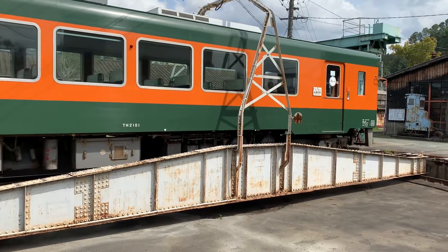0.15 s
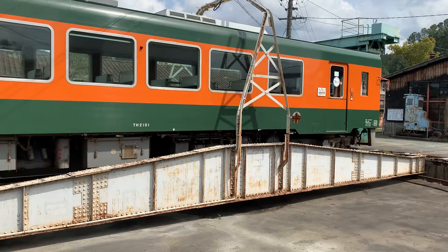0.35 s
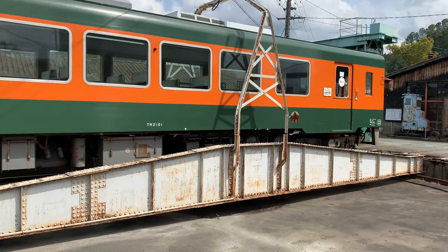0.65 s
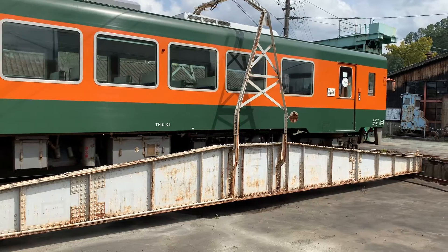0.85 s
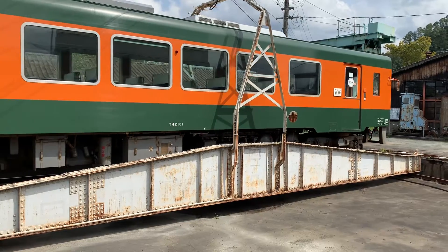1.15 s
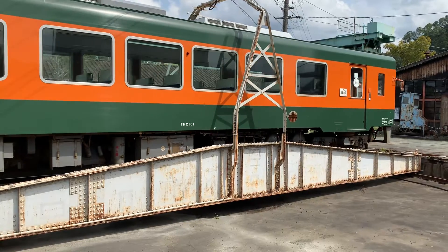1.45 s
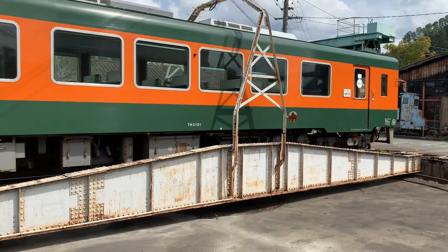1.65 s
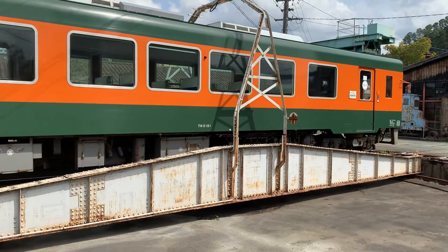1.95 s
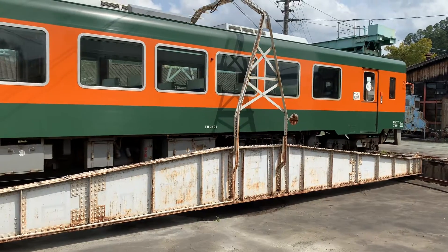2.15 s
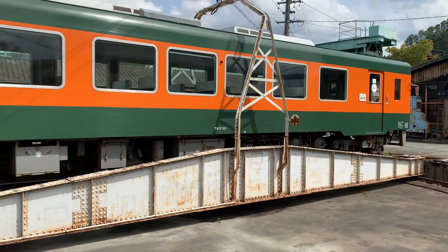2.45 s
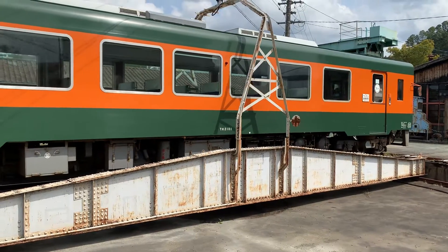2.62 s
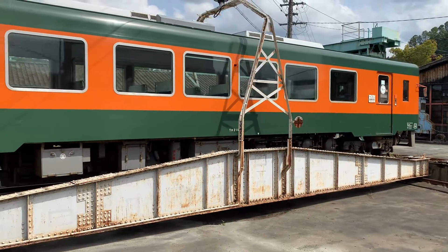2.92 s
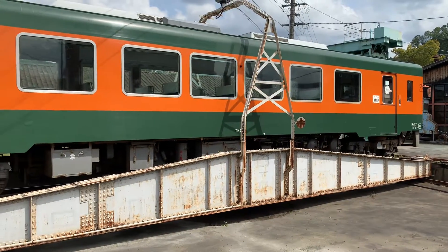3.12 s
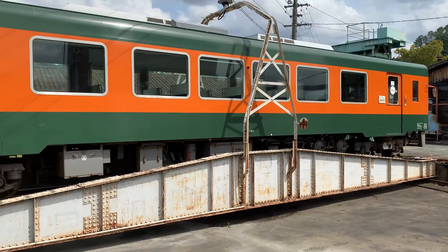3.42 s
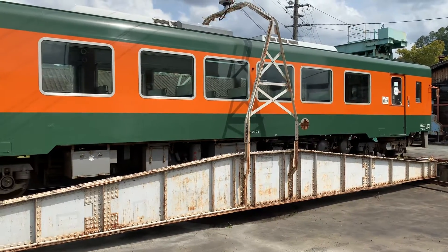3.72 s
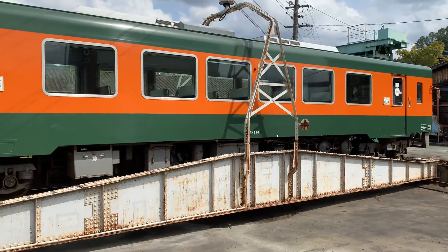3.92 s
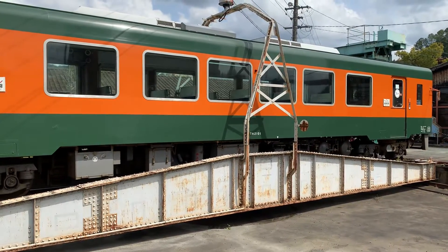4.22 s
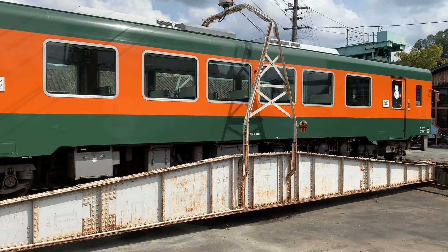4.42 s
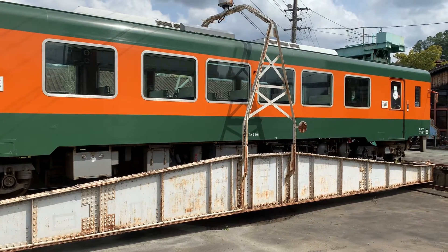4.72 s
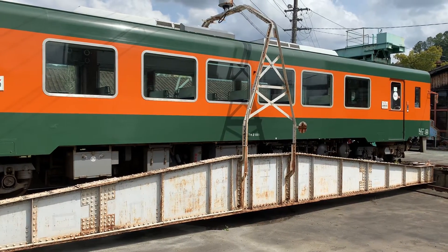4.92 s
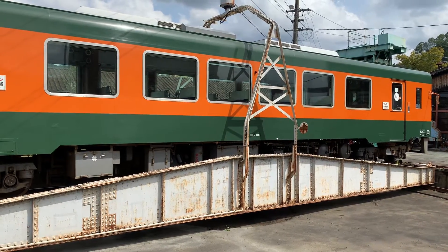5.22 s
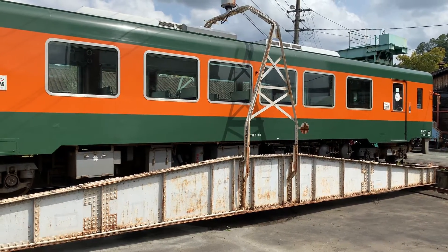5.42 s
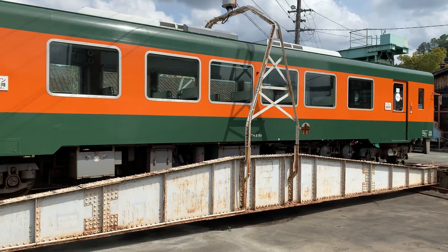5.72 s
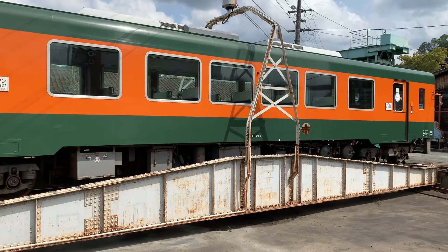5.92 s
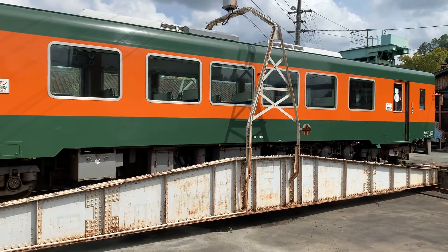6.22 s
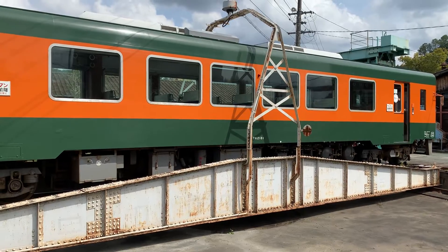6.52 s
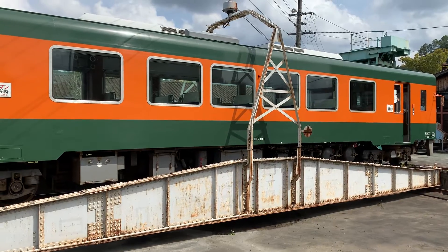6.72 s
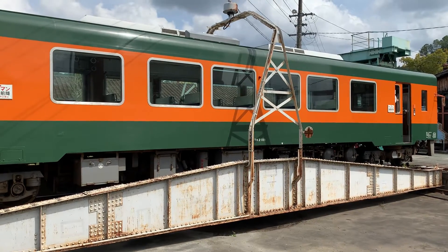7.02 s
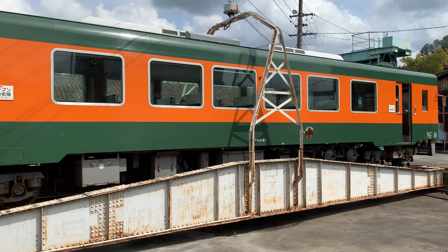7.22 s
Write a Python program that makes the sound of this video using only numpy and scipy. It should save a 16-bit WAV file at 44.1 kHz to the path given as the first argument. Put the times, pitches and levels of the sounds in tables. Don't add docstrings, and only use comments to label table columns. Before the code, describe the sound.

A diesel railcar idles with a steady roar and whine while its wheels clank heavily over rail gaps on a steel turntable bridge.

```python
import sys
import numpy as np
from scipy import signal
from scipy.fft import rfft, irfft, next_fast_len
from scipy.io import wavfile
from scipy.ndimage import uniform_filter1d

SR = 44100
rng = np.random.default_rng(int(sys.argv[2]) if len(sys.argv) > 2 else 0)


def volts_from_db(level):
    exponent = np.asarray(level, float) / 20
    return 10 ** exponent


def transcribe(u):
    v = np.clip(np.atleast_2d(u).T, -1, 1)
    q = np.round(v * 32767).astype(np.int16)
    wavfile.write(sys.argv[1], SR, q)


N = 324576
T = np.arange(N) / SR

# (time [s], plates [dB], beams [dB], rails [dB], wheel ring [dB])
CLUNKS = [(0.22, -32, -20, -38, -39), (0.245, -7, -15, -36, -30), (0.33, -14, -12, -28, -26),
          (0.386, -13, -8.5, -20, -6.5), (0.507, -26, -19, -14, -15), (0.536, -26, -27, -3, -10),
          (0.567, -22, -24, -12, -36), (0.735, -23, -20, -44, -48), (2.745, -24, -15, -34, -41),
          (0.997, -25, -32, -30, -24), (7.004, -18, -22, -42, -26), (1.943, -17.5, -33, -28, -42),
          (2.28, -27, -21, -27, -23), (2.468, -26, -19, -19, -16.5), (2.488, -14.5, -23, -17, -14.5),
          (2.894, -25, -16.5, -36, -38), (3.113, -18, -41, -39, -40), (4.049, -26, -28, -26, -35),
          (6.504, -11.5, -24, -23, -29), (6.559, -11, -11.5, -32, -35), (6.64, -18, -24, -23, -17.5),
          (6.692, -22, -10, -11, -24), (6.728, -15, -11.5, -34, -31), (6.813, -20, -11.5, -39, -32),
          (0.26, -24, -15, -22, -33), (0.301, -22, -21, -19, -30), (0.394, -26, -20, -15, -10),
          (0.444, -24, -22, -13, -20), (0.467, -15, -18, -19, -18), (0.636, -13.5, -15, -21, -40),
          (0.688, -16, -18, -26, -41), (2.507, -20, -22, -15, -24), (2.534, -18, -25, -18, -23),
          (2.609, -13, -19, -25, -36), (2.686, -15.5, -17, -26, -34), (2.803, -31, -16, -42, -38),
          (2.996, -14.5, -19, -21, -42), (3.165, -38, -35, -33, -38), (6.758, -14, -24, -28, -28),
          (6.942, -22, -17, -36, -40)]
# (time [s], level [dB], pitch [Hz])
THUDS = [(.742, -9, 90), (6.49, -22, 280), (2.75, -11, 99), (2.69, -20, 110), (.59, -18, 1100),
         (1.005, -22, 80), (1.47, -20, 125), (1.53, -21, 125), (1.61, -26, 90), (1.715, -20, 85),
         (1.91, -29, 290), (1.95, -32, 289.2), (2.13, -25, 125), (2.287, -16, 189.4), (2.297, -15, 90),
         (3.205, -22, 75), (3.285, -24, 70), (3.405, -25, 70), (3.53, -29, 70), (3.74, -24, 75),
         (3.845, -21, 90), (3.965, -24, 75), (4.055, -20, 125), (4.085, -25, 70), (4.465, -25, 125),
         (4.595, -18, 75), (4.96, -20, 85), (5.105, -23, 90), (5.425, -20.5, 121), (5.45, -20, 75),
         (5.545, -23, 120), (5.69, -24, 85), (5.76, -26, 120), (5.95, -30, 85), (6.27, -28, 75),
         (6.44, -28, 74.8), (.25, -15, 300), (.345, -17, 110), (.573, -16, 264), (.405, -14, 160),
         (.415, -14, 200), (6.701, -16, 130), (6.82, -15, 110), (7.3, -26, 270)]
# (time [s], level [dB], pitch [Hz])
KNOCKS = [(.444, -14, 706), (.534, -15, 1240), (.544, -12, 740), (.559, -9, 442), (.849, -24, 790),
          (1.038, -31, 2120), (1.054, -32, 431.7), (1.18, -22, 818), (1.26, -21, 412), (1.285, -31, 428),
          (1.707, -23, 860), (1.846, -21, 688), (1.88, -24, 635), (1.945, -17.5, 559), (2.168, -23, 624),
          (2.39, -23, 551), (2.472, -20, 816), (2.474, -19, 1620), (2.575, -22, 600), (6.515, -30, 2900),
          (6.51, -36, 4230), (6.64, -26, 998), (2.49, -12, 576), (2.496, -22, 1291), (2.508, -19, 344),
          (2.538, -17, 340), (2.563, -29, 900), (2.53, -28, 705), (3.008, -24, 796), (3.119, -20, 390),
          (3.326, -22, 409), (3.572, -26, 386.6), (4.775, -19, 1210), (4.852, -26, 430), (6.107, -28, 452),
          (6.494, -29, 2669), (6.504, -25, 2760), (6.53, -17, 610), (6.582, -40, 4651), (6.629, -21, 540),
          (6.666, -16.5, 581), (6.666, -34, 4177), (6.776, -20, 344.4), (6.867, -30, 841),
          (7.098, -26, 347), (7.263, -29, 343.4), (7.335, -27, 565), (.39, -35, 5211), (.39, -42, 5813),
          (.541, -37, 6373), (.54, -35, 6933), (.538, -16, 1593), (2.482, -42, 5211), (2.483, -47, 6070),
          (2.497, -37, 3850), (2.495, -45, 7278), (6.497, -36, 4080)]

# (frequency [Hz], level [dB], t60 [s])
SPAN_MODES = [(50, 0, 0.53), (62, -3, 0.36), (80, -2.5, 0.19)]
# (frequency [Hz], level [dB], t60 [s])
BEAM_MODES = [(95.9, -5, 0.49), (119, 0.5, 0.27), (140, -7.5, 0.21)]
# (frequency [Hz], level [dB], t60 [s])
PLATE_MODES = [(165, -13, 0.034), (219.5, -3.5, 0.23), (256.7, 2, 0.14), (298.7, -1.5, 0.21),
               (342.6, 4, 0.087), (408.3, 3.5, 0.1)]
# (frequency [Hz], level [dB], t60 [s])
RAIL_MODES = [(455, -6, 0.044), (552, -2.5, 0.083), (678, 1.5, 0.052), (780, 2.5, 0.045), (884, -13, 0.11),
              (1059, -4.5, 0.036), (1310, -15, 0.021)]
# (frequency [Hz], level [dB], t60 [s])
WHEEL_MODES = [(1420, -17, .04), (1591, 6, 0.058), (1689, 10.5, 0.055), (1582, 9, 0.047), (1700, -3, 0.05),
               (2055, 4, 0.1), (2257, -2.5, 0.15), (2720, -28, .04), (2970, -24, .04)]

# (time [s], level [dB])
ROLLING = [(0, -27), (.17, -34), (.8, -23.5), (1.15, -26.5), (1.4, -30.5), (2.1, -31.5), (2.9, -25),
           (3.15, -29), (3.5, -33), (4.6, -34.5), (5.5, -33), (6.45, -34.5), (7, -31), (7.36, -31)]
# (start [s], hold [s], shaking [dB])
CROSSINGS = [(0.165, 0.19, -20), (0.362, 0.087, -15.5), (0.496, 0.038, -15.5), (0.853, 0.15, -27.5),
             (1.823, 0.044, -25.5), (2.378, 0.025, -23.5), (2.462, 0.033, -17), (2.575, 0.017, -39),
             (6.481, 0.042, -19), (6.601, 0.033, -19), (6.68, 0.03, -19.5)]
# (time [s], level [dB], pitch [Hz])
SWAYS = [(0.309, -14.5, 101.5), (.36, -13, 52.3), (.52, -13.5, 79.7), (0.711, -18, 77), (.97, -34, 53.2),
         (1.22, -41, 62), (1.57, -23, 75), (1.85, -34, 69.64), (2.27, -24, 62), (2.389, -18.5, 114),
         (2.52, -19, 69), (2.629, -18, 73.5), (2.761, -17, 84.7), (2.821, -17.5, 62), (2.889, -32, 83.3),
         (3.249, -20, 59), (3.5, -28, 62), (3.72, -33, 74), (4.039, -33, 80.9), (4.441, -28, 99.5),
         (4.571, -28, 71.2), (4.92, -23, 62), (5.44, -27.5, 76.96), (5.7, -40, 75.1), (6.56, -18, 104),
         (6.611, -15.5, 79.5), (6.681, -21, 109.6), (6.685, -26, 140), (6.759, -25, 79), (7.1, -33, 68.64),
         (1.45, -30, 60), (3.38, -33, 55.02), (3.92, -24, 55), (4.46, -32, 151), (5.06, -31, 73.5),
         (5.2, -32, 51.7), (5.38, -23, 50), (5.58, -25, 58), (5.82, -35, 80), (5.6, -39, 140)]
# (start [s], hold [s], puff of air [dB], rattle of grit [dB])
JOLTS = [(0.214, 0.024, -47, -31), (0.3, 0.024, -51, -30.5), (0.375, .01, -41, -35), (0.48, 0.13, -47, -35),
         (0.784, 0.013, -45, -61), (0.903, 0.02, -51, -60), (0.999, 0.018, -43.5, -52),
         (1.212, 0.032, -52, -44), (2.466, .003, -52, -41), (2.474, 0.0086, -48, -42),
         (2.87, 0.024, -51, -42), (3.182, 0.02, -47, -39.5), (6.453, .015, -51, -34),
         (6.48, 0.033, -42, -27.5), (6.757, .02, -56, -40), (6.566, 0.11, -42.5, -33),
         (6.692, 0.059, -48, -35.5), (6.84, 0.083, -55, -40), (7.018, 0.072, -60, -40.5),
         (7.332, 0.01, -47, -46)]
JOLT_RISE_S, JOLT_T60_S = 0.0073, 0.1
# (frequency [Hz], density [dB per Hz])
GRIT = [(900, -1), (1500, -4.5), (2000, -4), (2800, -4), (3600, -8), (5000, -14.5), (9000, -21.5),
        (12000, -36), (15900, -32)]
# (time [s], pitch [Hz], level [dB])
GROAN = [
    (0.95, 118.5, -38),
    (1.1, 116.3, -25.5),
    (1.42, 119.8, -41),
    (1.5, 130.2, -34.5),
    (1.95, 139, -31),
    (2.24, 142.5, -31),
    (2.31, 143.4, -34),
    (2.42, 146, -25.5),
    (2.7, 151, -32),
]
# (time [s], pitch [Hz], level [dB])
LATE_GROAN = [
    (6.9, 137.2, -21),
    (6.96, 139.5, -38),
    (7.15, 145, -31.5),
    (7.25, 147.5, -49),
]
# (start [s], hold [s], level [dB])
ROUGH_BURSTS = [
    (1.34, 0.24, -48),
    (1.63, 0.21, -50.5),
    (6.85, 0.302, -64),
    (2.479, 0.016, -46),
    (4.698, .04, -42),
    (4.84, .08, -41),
    (6.486, .005, -52),
    (0.4, .008, -46),
    (0.47, .008, -45),
]
# (frequency [Hz], density [dB per Hz])
ROUGH_BAND = [(3600, -6), (4600, -4), (5000, -3), (5400, -8), (6200, -7)]

# (start [s], hold [s], level [dB])
SQUEALS = [
    [(2.46, 0.14, -62)],
    [(2.675, .06, -58)],
    [(3.884, 0.027, -49), (3.97, .02, -62), (4.145, .03, -57)],
    [(4.05, .0, -45), (4.075, 0.043, -40.5), (4.16, 0.05, -46), (4.25, 0, -35.5), (4.28, 0.059, -37)],
]
# (time [s], pitch [Hz])
SQUEAL_HZ = [
    [(0, 3840)],
    [(0, 3690)],
    [(3.9, 7245), (3.95, 7255), (3.99, 7315), (4.04, 7270), (4.17, 7234)],
    [(4.05, 7716), (4.25, 7712), (4.28, 7706), (4.5, 7702)],
]
# (time [s], level [dB])
LEAK = [
    (0, -51.5),
    (1.3, -52),
    (2.2, -54),
    (3.3, -53.5),
    (4.05, -51),
    (5.1, -49),
    (5.85, -49.5),
    (6.1, -57),
    (7.36, -55.5),
]
# (frequency [Hz], density [dB per Hz])
AIR = [(400, 7), (1200, -2), (2800, 0.5), (3500, -7.5), (5000, 0), (7600, -3), (8600, -10), (9800, 1.5),
       (12200, -0.5), (13300, -2), (14600, -5), (15900, -7)]
# (frequency [Hz], density [dB per Hz])
NOZZLE = [(4800, -12), (5200, -4), (5700, -10), (6250, 5), (6700, -10), (7400, -11), (7900, -14)]
VENT_S, VENT_RISE_S, VENT_HOLD_S, VENT_T60_S = 4.699, 0.038, 0.068, 0.3

# (time [s], pitch [Hz], level [dB])
WHINE = [(0, 865.6, -41), (.8, 855.5, -43), (.92, 862.4, -34), (1.28, 852.4, -37), (1.42, 854, -41.5),
         (1.85, 854, -39), (2.5, 849.7, -44), (3, 850.7, -41.5), (3.3, 854, -39.5), (3.9, 848, -31.5),
         (4.14, 846, -45), (4.7, 837, -33.5), (4.92, 843, -46), (5.15, 845.6, -34.5), (5.45, 849, -37),
         (5.8, 843.7, -37.5), (6.4, 846, -38), (7.36, 859.7, -38)]
# (multiple of the rate [1], level [dB])
FIRING_ORDERS = [(2, -42), (10, -47), (11, -45.5), (16, -49), (18, -49), (35, -49.5), (41, -44), (44, -76),
                 (47, -44)]
CYLINDERS_DB = [
    0,
    -2.5,
    -1,
    -3.5,
    -1,
    -2,
]
# (frequency [Hz], density [dB per Hz])
BLOCK = [(71, -24), (120, -17), (340, -19.5), (408, 8.5), (446, -7.5), (569, -1), (766, -3), (838, -0.5),
         (953, -5.5), (1250, -1.5), (1350, -4), (1680, 1.5), (1770, -1.5), (1930, -12), (2600, -30),
         (3380, -23), (5720, -120)]
# (frequency [Hz], density [dB per Hz])
CLATTER = [(1700, -13), (2100, 4), (2950, -5.5), (3150, -5), (3800, -9.5), (5000, -12.5), (6200, -21),
           (8500, -14), (11000, -26), (14000, -38), (15900, -17)]
# (frequency [Hz], density [dB per Hz])
LOPE = [(350, -15), (400, -4.5), (470, -28), (570, 5), (660, -23)]

# (frequency [Hz], phase [turns])
PORT_TURNS = [(0, 0), (860, -.12), (1550, -.08), (1720, -.15), (2070, -.5), (2410, -.95), (2760, -1.17),
              (3450, -1.43), (3960, -1.9), (5000, -2.43), (5500, -2.54), (6030, -2.88), (6550, -2.98),
              (7060, -2.85), (8350, -2.5), (11000, -2), (13400, -1.5), (15700, -1)]
# (frequency [Hz], likeness [0-1])
PORT_SAME = [(60, 0.83), (300, 0.91), (800, 0.78), (1400, 0.65), (2070, 0.32), (2400, 0), (2900, 0.63),
             (3450, 0.54), (4000, 0.12), (5000, 0.35), (6000, 0.43), (6550, 0.84), (7100, 1), (8000, 0.91),
             (16000, 1)]
# (frequency [Hz], left minus right [dB])
PORT_BALANCE = [(300, 0), (1150, 5), (1900, -1.5), (2300, 1.5), (5300, -3.5), (6600, -0.5)]


def clunks():
    out = np.zeros((2, N + SR))
    grit = noise(GRIT, patchy_db=-6.0)
    t = T[:SR // 4]
    push_hz, push_s, push_db = 134, 0.0068, 3.5
    push = -np.sin(2 * np.pi * push_hz * t) * t / push_s * np.exp(1 - 2 * t / push_s)
    tick = (1 - np.exp(-t / 0.0027)) * np.exp(-t / 0.011)
    for s, plates_db, beams_db, rails_db, wheel_db in CLUNKS:
        at = round((s - .005) * SR)
        blow = rng.standard_normal((2, 900)) * t[:900] * np.exp(-t[:900] / 0.0063)
        parts = [(PLATE_MODES, plates_db - 0.5), (BEAM_MODES, beams_db - 1.5),
                 (RAIL_MODES, rails_db + 2), (WHEEL_MODES, wheel_db - 0.5)]
        for modes, db in parts:
            response = ring(modes, detune=.008, damping=0.67)
            sound = signal.fftconvolve(blow, response[None], axes=1)
            out[:, at:at + sound.shape[1]] += volts_from_db(db) * sound / abs(sound).max()
        fresh_grit = np.roll(grit, -at // 2, 1)[:, :len(t)]
        out[:, at:at + len(t)] += volts_from_db(0.8 * wheel_db - 29) * tick * fresh_grit
        out[:, at + 300:at + 300 + len(t)] += volts_from_db(beams_db + push_db) * push
    return out[:, :N]


def thuds():
    return swings(THUDS, cycles=.6, min_s=0)


def knocks():
    return swings(KNOCKS, cycles=2.4, min_s=0.0057)


def girders():
    load_db, plates_db = rolling_load()
    s, db, _ = np.transpose(SWAYS)
    spans_db = bursts(s, 0, db - 10.5, .05, 1, load_db - 3.0)
    s, _, db = np.transpose(CLUNKS)[:3]
    beams_db = bursts(s, 0, db - 11.0, 0.017, 0.27, load_db - 3.5)
    rails_db = plates_db - 7.0 + 0.29 * (plates_db + 19.0)
    out = shaken(SPAN_MODES, spans_db + 0.48, per_s=140, spread_db=1.0)
    out += shaken(BEAM_MODES, beams_db - .3, per_s=200, spread_db=3.0)
    out += shaken(PLATE_MODES, plates_db - 3.0, per_s=900, spread_db=2.5)
    out += shaken(RAIL_MODES, rails_db, per_s=900, spread_db=2.5)
    return out


def sways():
    out = np.zeros((2, N + SR))
    t = T[:SR // 2]
    shape = np.minimum(t / 0.022, 1) * volts_from_db(-60 * t / 0.51)
    port_turns = rng.random((len(SWAYS), 2, 1))
    for (s, db, hz), turns in zip(SWAYS, port_turns):
        swing = np.sin(2 * np.pi * (hz * t + turns))
        out[:, round(s * SR):][:, :len(t)] += volts_from_db(db + 3.0) * shape * swing
    return out[:, :N]


def grit_rattle():
    _, plates_db = rolling_load()
    s, hold, _, db = np.transpose(JOLTS)
    loose_db = bursts(s, hold, db, JOLT_RISE_S, 3.8 * JOLT_T60_S, -29 + .5 * plates_db)
    grit = noise(GRIT, patchy_db=1.3, streaky_db=2.2)
    return grit * volts_from_db(loose_db + 2.0 + 1.0 * wander(rate_hz=16.5))


def rough_bands():
    rough_db = bursts(*np.transpose(ROUGH_BURSTS), 0.0046, 0.12) + 3.3 * wander(rate_hz=44)
    return volts_from_db(rough_db) * noise(ROUGH_BAND, patchy_db=3.5)


def groans():
    waver = 1 + 0.004 * wander(rate_hz=5.4)
    flutter_db = 1.3 * wander(rate_hz=11)
    out = np.zeros((2, N))
    for rows in GROAN, LATE_GROAN:
        hz, db = curves(rows)
        sounding = (T > rows[0][0]) * (T < rows[-1][0])
        out += tone(hz * waver, db + flutter_db) * sounding
    return out


def squeals():
    out = np.zeros((2, N))
    for grabs, pitch in zip(SQUEALS, SQUEAL_HZ):
        hz, = curves(pitch)
        grab_db = bursts(*np.transpose(grabs), 0.04, 0.36, -110)
        out += tone(hz, grab_db + 4.5)
    return out + tone(hz, grab_db - 16, 2)


def brake_air():
    s, hold, db, _ = np.transpose(JOLTS)
    leak_db = bursts(s, hold, db, JOLT_RISE_S, JOLT_T60_S, *curves(LEAK))
    vent_db = bursts(VENT_S, VENT_HOLD_S, -25.5, VENT_RISE_S, VENT_T60_S)
    air = noise(AIR, patchy_db=1.6, streaky_db=3.5)
    flow = np.hypot(volts_from_db(leak_db + 0.81 * wander(rate_hz=33)), volts_from_db(vent_db))
    out = flow * volts_from_db(4.0) * air
    spit_db = bursts([VENT_S, 7.315], .03, [-43, -50], VENT_RISE_S, 0.27)
    bright_air = signal.lfilter([1, -4, 6, -4, 1], 1, np.roll(air, N // 2, 1))
    out += volts_from_db(spit_db) * bright_air
    roar_db = bursts(VENT_S, VENT_HOLD_S, -33 + 6.5, VENT_RISE_S, 0.68)
    return out + volts_from_db(roar_db) * noise(GRIT, patchy_db=0.5)


def nozzle():
    whistle_db = bursts(VENT_S + .012, VENT_HOLD_S, -37, .03, VENT_T60_S)
    return volts_from_db(whistle_db) * noise(NOZZLE, patchy_db=3.0, streaky_db=0.0)


def engine():
    whine_hz, whine_db = curves(WHINE)
    firing_hz = whine_hz / 23
    turns = np.cumsum(firing_hz) / SR
    strength = volts_from_db(np.take(CYLINDERS_DB, turns.astype(int) % 6))
    kick = strength * uniform_filter1d(np.exp(-(turns % 1) / .3), size=60)
    knock = strength * np.exp(-(2 * turns % 1) / .4)
    out = volts_from_db(-29.5) * noise(BLOCK, patchy_db=1.2) * evened(1 + .6 * kick + .3 * knock)
    clatter = noise(CLATTER, patchy_db=0.8, streaky_db=3.6)
    out += volts_from_db(-39.5) * clatter * evened(1 + .65 * kick)
    for order, db in FIRING_ORDERS:
        unsteady_hz = firing_hz * (1 + 0.00406 * wander(rate_hz=6.48))
        out += tone(unsteady_hz, db + 3.8 * wander(rate_hz=2.36), round(order))
    unsteady_hz = whine_hz * (1 + 0.00253 * wander(rate_hz=9.0))
    return out + tone(unsteady_hz, whine_db + 1.0 * wander(rate_hz=4.7))


def lope():
    cycles = np.cumsum(curves(WHINE)[0] / (23 * 6)) / SR
    level_db = -42 + 5.4 * np.cos(2 * np.pi * (cycles - 0.18))
    return volts_from_db(level_db) * noise(LOPE, patchy_db=4.0)


def rolling_load():
    load_db, = curves(ROLLING)
    return load_db, bursts(*np.transpose(CROSSINGS), 0.029, 0.76, load_db)


def shaken(modes, db, per_s, spread_db):
    size = volts_from_db(spread_db * np.minimum(rng.exponential(1, (2, N)), 4))
    sign = rng.choice([-1., 1.], (2, N))
    struck = rng.random((2, N)) < per_s / SR
    blows = evened(size * sign * struck)
    response = ring(modes, damping=2.9)
    response = response[None] / np.linalg.norm(response)
    return signal.oaconvolve(volts_from_db(db) * blows, response, axes=1)[:, :N]


def ring(modes, detune=0, damping=1):
    hz, db, t60 = np.transpose(modes)[:, :, None]
    t = T[:SR // 4]
    hz = hz * (1 + detune * rng.standard_normal(hz.shape))
    return (volts_from_db(db - 60 * damping * t / t60) * np.sin(2 * np.pi * hz * t)).sum(0)


def swings(rows, cycles, min_s):
    out = np.zeros((2, N + SR))
    u = np.arange(-1000, 3000) / SR
    for (s, db, hz), turns in zip(rows, rng.random((len(rows), 1))):
        width = max(cycles / hz, min_s)
        shape = np.exp(-(u / np.where(u < 0, 0.98 * width, 1.36 * width)) ** 2)
        phase = 2 * np.pi * (hz * u + turns)
        swing = np.array([np.cos(phase), np.sin(phase)])
        out[:, round(s * SR) - 1000:][:, :len(u)] += volts_from_db(db) * shape * swing
    return out[:, :N]


def bursts(start, hold, db, rise_s, t60, floor_db=-90):
    coarse = T[::64]
    since = coarse - np.reshape(start, (-1, 1))
    fading = np.maximum(since - rise_s - np.reshape(hold, (-1, 1)), 0)
    gain = np.clip(since / rise_s, 0, 1) * volts_from_db(np.reshape(db, (-1, 1)) - 60 * fading / t60)
    power = np.interp(T, coarse, (gain ** 2).sum(0))
    return 10 * np.log10(power + volts_from_db(2 * floor_db))


def tone(hz, db, multiple=1):
    turns = multiple * np.cumsum(hz * np.ones(N)) / SR + rng.random()
    pair = np.array([np.sin(2 * np.pi * turns), -np.cos(2 * np.pi * turns)])
    return np.sqrt(2) * volts_from_db(db) * pair


def noise(spectrum, patchy_db, streaky_db=0):
    hz = np.fft.rfftfreq(1024, 1 / SR)
    a, b, c, d, chance = rng.standard_normal((N // 256 + 5, 513, 5)).T
    patches = uniform_filter1d(uniform_filter1d(chance, size=5, axis=0), size=10, axis=1)
    streaks = uniform_filter1d(uniform_filter1d(chance[::-1], size=2, axis=0), size=8, axis=1)
    level_db = read(spectrum, hz)[:, None] + patchy_db * evened(patches) + streaky_db * evened(streaks)
    inside = (hz >= spectrum[0][0]) & (hz <= spectrum[-1][0])
    z = np.array([a + 1j * b, c + 1j * d]) * volts_from_db(level_db) * inside[:, None]
    return evened(signal.istft(z, nperseg=1024, noverlap=768)[1][:, :N])


def wander(rate_hz):
    low_pass = signal.butter(2, rate_hz, fs=SR, output="sos")
    return evened(signal.sosfilt(low_pass, rng.standard_normal(N)))


def evened(x):
    return x / np.sqrt(np.mean(x ** 2) + 1e-20)


def read(points, hz):
    f, value = np.transpose(points)
    return np.interp(np.log(hz + 1), np.log(f + 1), value)


def curves(rows):
    s, *columns = np.transpose(rows)
    return [np.interp(T, s, c) for c in columns]


def scene():
    steel = clunks() + thuds() + knocks() + girders() + sways()
    friction = grit_rattle() + rough_bands() + groans() + squeals()
    return steel + friction + brake_air() + nozzle() + engine() + lope()


def top_cut(x):
    return signal.sosfilt(signal.butter(12, 17040, fs=SR, output="sos"), x)


def record(dry):
    dry = dry / (1 + (dry / .68) ** 6) ** (1 / 6)
    size = next_fast_len(N + 4096)
    hz = np.fft.rfftfreq(size, 1 / SR)
    left, other = rfft(dry, size)
    same = np.clip(read(PORT_SAME, hz), 0, 1)
    turn = np.exp(2j * np.pi * np.interp(hz, *np.transpose(PORT_TURNS)))
    right = turn * (same * left + np.sqrt(1 - same ** 2) * other)
    tilt = volts_from_db(read(PORT_BALANCE, hz) / 2)
    top_hz, low_cut_hz = 15740, 49.7
    ports = irfft(np.array([left * tilt, right / tilt]) * (hz < top_hz), size)[:, :N]
    ports = ports / (1 + (ports / .85) ** 8) ** (1 / 8)
    low_cut = signal.butter(5, low_cut_hz, "high", fs=SR, output="sos")
    mix = signal.sosfilt(low_cut, ports)
    return top_cut(mix)


dry = scene()
out = record(dry)
transcribe(out)
```